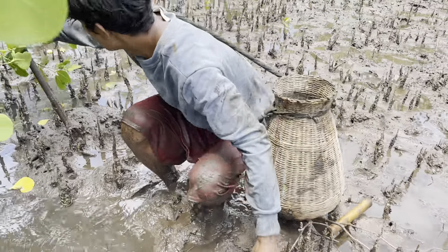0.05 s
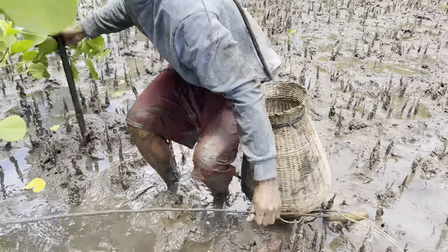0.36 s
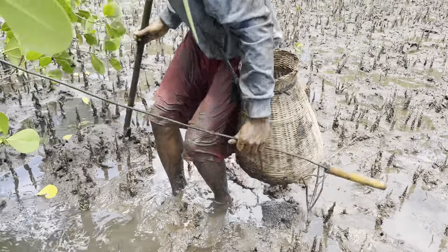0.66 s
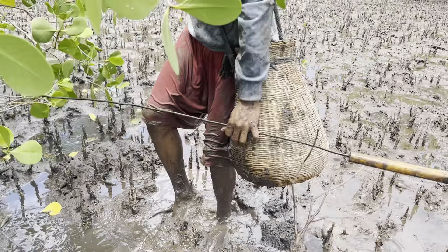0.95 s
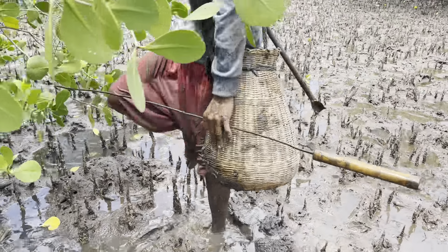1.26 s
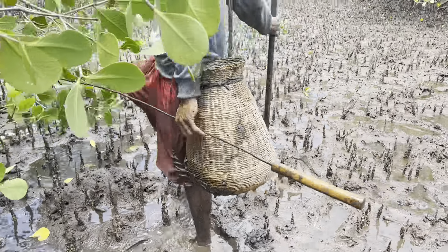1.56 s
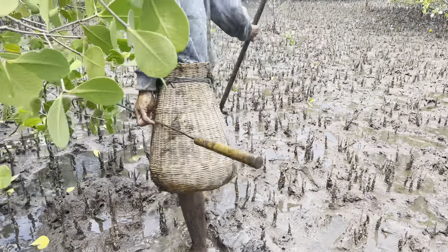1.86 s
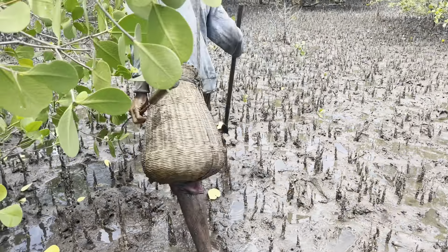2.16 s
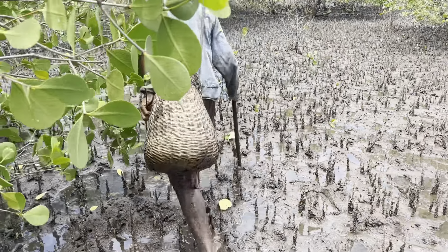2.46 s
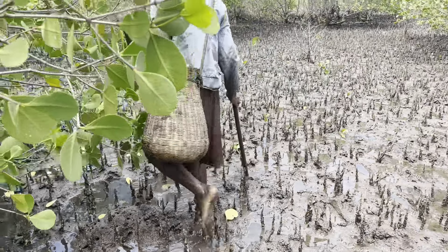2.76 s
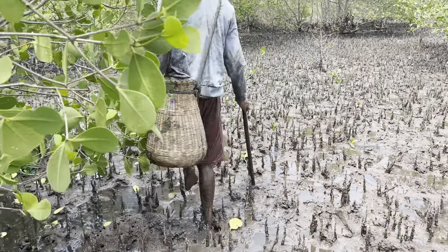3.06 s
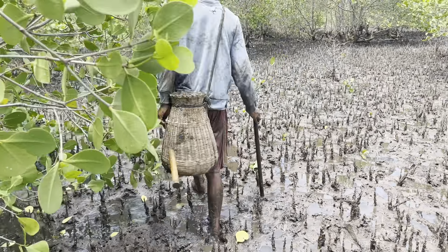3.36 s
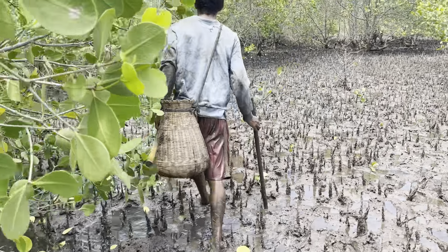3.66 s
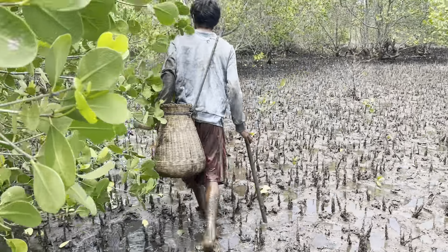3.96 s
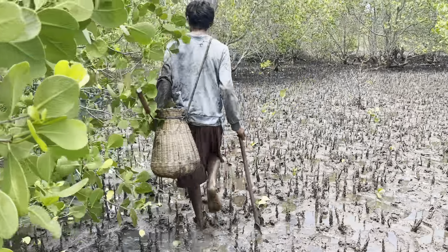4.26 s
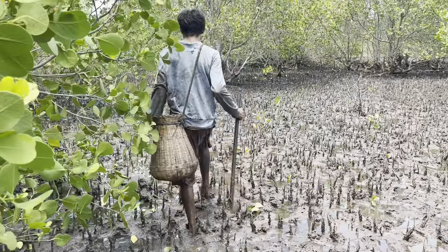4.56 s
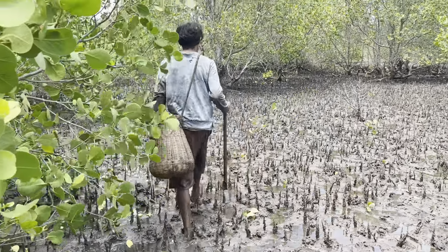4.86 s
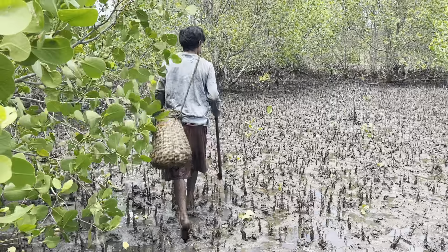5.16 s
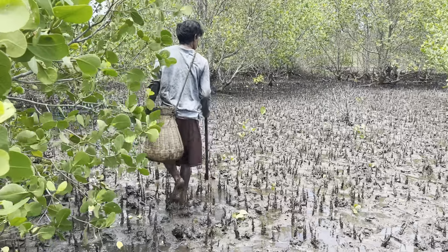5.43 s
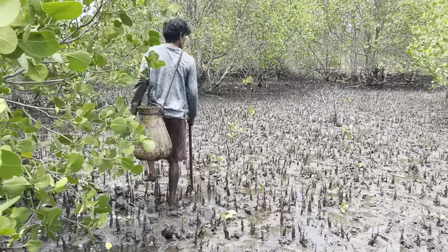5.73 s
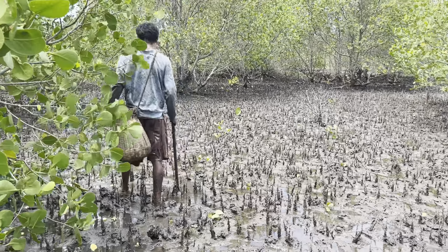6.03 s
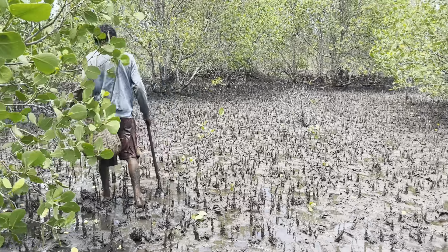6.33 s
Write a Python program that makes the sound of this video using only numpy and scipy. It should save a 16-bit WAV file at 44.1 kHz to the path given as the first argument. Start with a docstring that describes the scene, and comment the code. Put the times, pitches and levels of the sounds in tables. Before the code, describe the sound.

Someone wades off barefoot through sucking mud, with gurgles, wet pops, two light knocks on wicker and a far engine throb.

```python
"""Barefoot on a tidal mud flat.

A walker rises out of shallow water and wades off. Each foot sucks free in ringing air pockets, gurgles
and snapping mud films, squeezes out water and lands with a thud; the stirred slurry crackles on.
A carried tool knocks twice on a wicker basket. A slow boat engine thuds far away under faint open air."""
import sys
import numpy as np
from scipy import signal
from scipy.fft import rfft, irfft, next_fast_len
from scipy.io import wavfile
from scipy.ndimage import uniform_filter1d, map_coordinates

SR = 44100
rng = np.random.default_rng(int(sys.argv[2]) if len(sys.argv) > 2 else 0)


def master(y):
    """Save y as 16-bit WAV."""
    cut = np.clip(np.atleast_2d(y).T, -1, 1)
    pcm = np.round(cut * 32767)  # scale
    wavfile.write(sys.argv[1], SR, pcm.astype(np.int16))


N = 286203

# Event levels are relative: each source adds its own gain.
# Stirred mud. Each row: time in seconds, slurry level in dB, crackle level in dB.
STIR_LEVELS = [(0.0, -56, -52.5), (0.36, -53, -57.5), (1.14, -52.5, -53), (1.57, -67.5, -61.5),
               (1.81, -55.5, -58.5), (1.97, -62, -58), (2.17, -70, -71), (2.35, -74, -70), (2.42, -67, -61),
               (2.52, -60, -53), (2.6, -70, -55.5), (2.67, -50.5, -55.5), (2.86, -59.5, -61),
               (3.13, -61, -62.5), (3.42, -68.5, -67), (3.56, -60, -58.5), (4.05, -52.5, -56),
               (4.21, -53, -54), (4.37, -55, -56), (4.55, -58, -57), (4.75, -58, -59.5), (4.91, -58.5, -58),
               (5.03, -74, -69.5), (5.15, -69.5, -69), (5.33, -58, -60), (5.51, -64.5, -70),
               (5.8, -72.5, -74.5), (6.49, -77.5, -71.5)]
# Exhaust note. Each row: multiple of the firing rate, level in dB.
EXHAUST_ORDERS = [(5, -54), (6, -56), (7, -56.5), (9, -56.5), (10, -63), (11, -62.5), (17, -67.5)]
# Open air, growing as the microphone turns to the trees. Each row: time in seconds, level in dB.
AIR_LEVELS = [(2.3, -90.5), (5.8, -71.5)]
# Large air pockets. Each row: start in seconds, peak in dB, start in Hz, glide in octaves, t60 in seconds.
AIR_POCKETS = [(0.361, -36, 590, 0.5, 0.014), (0.502, -30.5, 1750, -1, 0.021),
               (0.574, -27, 910, -2.5, 0.019), (0.579, -24, 785, -1, 0.02), (0.582, -22.5, 1184, 0, 0.022),
               (0.584, -35, 1920, -0.9, 0.034), (0.6291, -22.5, 823, 0.7, 0.016),
               (0.855, -33.5, 430, -2.1, 0.021), (0.996, -20, 1636, 0.7, 0.0086),
               (0.996, -24.5, 886, 0.5, 0.016), (1.048, -41, 930, -3, 0.03), (1.073, -38, 640, 0, 0.049),
               (1.172, -35.5, 1070, 3, 0.013), (1.192, -33.5, 1670, 1, 0.01),
               (1.194, -41, 1040, -.4, 0.0096), (1.2811, -26, 865, 2.06, 0.037),
               (1.294, -34.5, 1306, 1, 0.037), (1.3205, -46.5, 2960, -0.5, 0.013),
               (1.407, -49, 924, 0.5, 0.1), (1.552, -44, 1980, 0.4, .018), (1.566, -46.5, 1740, -0.2, 0.04),
               (1.674, -31.5, 800, 2.5, 0.011), (1.753, -39, 2730, 1, .03), (1.755, -32, 1126, 1, 0.021),
               (1.764, -30.5, 1500, 3, 0.0046), (1.796, -40, 990, 0.5, 0.021),
               (2.151, -49, 1440, -1, 0.017), (2.4262, -29, 1444, 3.5, 0.012),
               (2.45, -33.5, 3370, -0.5, 0.034), (2.432, -26, 1520, 0.2, 0.017),
               (2.445, -36, 810, 0.2, 0.024), (2.46, -28.5, 1070, 0, 0.03), (2.477, -28, 1150, 0.5, 0.01),
               (2.484, -38, 1150, 1, .016), (2.492, -30, 905, 0.3, 0.022), (2.511, -34, 1000, 1.5, 0.017),
               (2.522, -33.5, 1660, 0.3, 0.017), (2.585, -30.5, 1055, 0, 0.021),
               (2.614, -28, 880, -0.5, 0.018), (2.65, -39, 1830, 2.5, 0.013),
               (2.733, -39.5, 536, 1.5, 0.049), (2.735, -43, 2000, 1, 0.015), (2.756, -40, 840, 0, 0.019),
               (2.778, -36.5, 1007, 3.5, 0.012), (3.414, -36.5, 740, 2.5, 0.01),
               (3.423, -40.5, 715, -1, 0.022), (3.443, -41.5, 640, -0.7, 0.028),
               (3.548, -44, 548, 0.5, 0.059), (3.743, -34.5, 954, -1.1, 0.021), (3.833, -38, 395, 0, 0.096),
               (3.877, -33.5, 1990, 3, 0.0091), (3.877, -32.5, 695, -0.2, 0.026),
               (3.916, -31.5, 2230, 1, 0.014), (3.926, -41, 2250, -2.5, .009),
               (3.943, -40.5, 930, 2.5, 0.012), (3.9669, -29.5, 1750, 0.3, 0.0044),
               (3.987, -47.5, 2200, 0, 0.01), (4.004, -30, 865, -1.3, 0.0049),
               (4.052, -29, 678, 1.15, 0.025), (4.056, -35, 2260, 0.7, 0.021), (4.1, -22, 1854, 0, 0.016),
               (4.098, -20, 2550, -0.5, 0.0062), (4.112, -33, 2630, 1, 0.0083),
               (4.127, -41, 1770, 4.5, 0.024), (4.14, -44.5, 1260, 3.5, 0.043),
               (4.157, -40.5, 750, -0.5, 0.052), (4.162, -40, 2920, -1, 0.012),
               (4.183, -25, 1150, 0, 0.0027), (4.189, -41, 1720, -0.2, 0.019), (4.253, -25, 917, 1, 0.0038),
               (4.2897, -31, 1720, -1.5, 0.0043), (4.345, -41, 1060, 4.5, .01),
               (4.354, -40, 1320, 1, 0.023), (4.377, -30, 2100, -0.5, 0.0025),
               (4.806, -40, 1670, 0, 0.0084), (5.118, -49, 2260, -1.1, 0.026),
               (5.235, -36, 2640, -0.1, 0.0061), (5.263, -35.5, 1940, 0.5, 0.0044),
               (5.537, -34, 420, -2.5, 0.016), (5.636, -50.5, 1690, 0.5, 0.031),
               (6.313, -51, 1520, 0, 0.012)]
# Water squirting out. Each row: start in seconds, spray in dB, slop in dB, length in seconds.
SQUIRTS = [(0.404, -46, -39.5, 0.041), (0.565, -50, -41, 0.016), (1.082, -40.5, -53, 0.039),
           (1.136, -39, -39, 0.028), (1.667, -42.5, -37, 0.025), (1.7, -41, -38, 0.021),
           (1.723, -51.5, -38.5, 0.07), (1.856, -48.5, -58, 0.051), (2.417, -60, -36, 0.03),
           (2.585, -53, -43.5, 0.02), (3.407, -48, -41, 0.049), (3.817, -40.5, -29, 0.028),
           (4.075, -50.5, -45, 0.026), (4.228, -52.5, -34, 0.034), (4.307, -43.5, -46, 0.034),
           (4.776, -49.5, -47, 0.068), (5.222, -64, -39, 0.024), (5.386, -56, -57, 0.064),
           (6.022, -51.5, -57, 0.045)]
# Mud films snapping, drops landing, and the tool's sharp tick on the basket (3.046 s).
# Each row: start in seconds, spray in dB, smack in dB, ping pitch in Hz, t60 in seconds.
SNAPS_AND_TICKS = [(0.5002, -21, -34, 4480, 0.02), (0.531, -25.5, -58, 3330, 0.0074),
                   (0.573, -32, -45, 8450, 0.043), (0.581, -22.5, -39, 2930, 0.019),
                   (0.627, -31.5, -22, 4290, 0.036), (0.706, -29.5, -39, 10600, 0.015),
                   (0.7768, -46, -21.5, 4800, 0.0099), (0.8246, -21, -48, 10500, 0.0058),
                   (0.8754, -36.5, -28.5, 3470, 0.04), (0.934, -31.5, -58.5, 4340, 0.074),
                   (0.971, -35, -53, 9100, 0.03), (1.0893, -23.5, -61, 8950, 0.033),
                   (1.2174, -28, -52, 8550, 0.011), (1.28, -30, -24, 5500, 0.014),
                   (1.467, -33.5, -34, 9300, 0.044), (1.672, -39, -20.5, 4630, 0.014),
                   (1.7031, -19.5, -25.5, 4690, 0.014), (1.8107, -30, -55, 7400, 0.0054),
                   (1.955, -36, -54, 8600, 0.016), (1.969, -33.5, -54, 8580, 0.012),
                   (2.153, -51, -58, 10700, 0.12), (2.473, -27, -43, 3270, 0.016),
                   (2.585, -29, -35, 8400, 0.015), (2.611, -32.5, -37, 8800, 0.064),
                   (2.783, -36, -39, 2810, 0.007), (3.046, -29, -68, 3570, 0.024),
                   (3.444, -35, -55, 8000, 0.014), (3.519, -35, -59, 9200, 0.015),
                   (3.546, -39.5, -35, 4370, 0.033), (3.7596, -26, -29, 7840, 0.026),
                   (3.815, -26, -12, 5200, 0.032), (3.8412, -26.5, -51, 8100, 0.019),
                   (3.9165, -22, -13.5, 5150, 0.0054), (4.0037, -30.5, -41, 8430, 0.012),
                   (4.023, -33, -48, 6600, 0.011), (4.0538, -30, -45, 5400, .01),
                   (4.1022, -14.5, -45, 10700, 0.013), (4.162, -37, -42, 5500, .006),
                   (4.184, -30.5, -37, 9300, 0.02), (4.226, -33, -41.5, 5450, 0.071),
                   (4.253, -41, -36, 5630, .004), (4.276, -35, -25.5, 11300, 0.021),
                   (4.2904, -26, -14.5, 4170, 0.012), (4.3765, -32, -38, 3380, 0.0036),
                   (4.524, -42.5, -43, 4630, 0.079), (4.804, -34, -52, 5600, 0.034),
                   (4.955, -44, -40, 4680, 0.063), (5.1218, -43, -46.5, 8340, 0.14),
                   (5.2817, -34.5, -30, 8000, 0.0084), (5.3595, -32, -35, 8200, 0.036),
                   (5.43, -27.5, -35, 4500, 0.0064), (5.44, -40, -30, 2640, 0.009),
                   (5.5339, -37, -20.5, 3720, 0.0082), (5.7751, -42.5, -35, 8350, 0.016)]
# Air drawn under a lifting foot.
# Each row: start and end in seconds, level in dB, first and last cavity pitch in Hz.
GURGLE_RUNS = [(0.574, 0.59, -35.5, 930, 954), (0.999, 1.076, -49, 1090, 740),
               (1.743, 1.786, -48.5, 1490, 1200), (1.856, 1.903, -49.5, 665, 1690),
               (2.424, 2.437, -44.5, 1740, 1540), (2.441, 2.491, -42.5, 952, 1150),
               (2.452, 2.477, -55, 3260, 3050), (2.509, 2.537, -44.5, 1010, 934),
               (2.539, 2.583, -50, 720, 960), (2.587, 2.599, -45.5, 2320, 2190),
               (2.599, 2.666, -50, 950, 1100), (2.713, 2.798, -53, 810, 1240),
               (3.244, 3.389, -64.5, 517, 454), (3.558, 3.613, -64, 474, 726),
               (3.63, 3.708, -61, 1600, 2010), (3.9, 4.09, -57, 1690, 1300), (4.114, 4.2, -57, 1420, 2060),
               (4.234, 4.259, -61, 1000, 860), (5.227, 5.268, -57.5, 1510, 2250),
               (6.09, 6.14, -68.5, 1200, 1520)]
# Weight landing. Each row: start in seconds, level in dB, t60 in seconds.
FOOTFALLS = [(0.593, -32.5, 0.045), (3.825, -38, 0.16), (4.008, -33.5, 0.033), (4.243, -39, 0.091),
             (4.293, -45, 0.04), (5.54, -46, 0.073)]
# Hollow under a foot. Each row: pitch in Hz, level in dB, share of the footfall's t60.
HOLLOW_MODES = [(142.4, 5.5, 2), (189, -17, 0.31), (305, 3, 0.21), (404.4, -3, 0.46), (466, -18, 0.54)]
# Tool on basket. Each row: start in seconds, level in dB, crunch in dB, low and high mode cutoff in Hz.
TOOL_KNOCKS = [(2.827, -32.5, -1.5, 119, 8840), (3.044, -40.5, -15.5, 646, 4200)]
# Tool and basket ringing. Each row: pitch in Hz, level in dB, t60 in seconds.
BASKET_MODES = [(185, -6, .24), (395, -12, .12), (790, -11, .08), (1050, -7, .08), (2975, -4, .07),
                (3140, -4, .07), (3650, -5, .06), (3980, -5, .08), (4060, -6, .085), (4555, 0, .07),
                (4650, -1, .07), (5110, -3, .06), (5820, -9, .05), (8400, -7, .06)]

# Spectra. Each row: frequency in Hz, gain in dB.
SLOP_DB = [(150, 2.5), (350, -3.5), (700, -3.5), (1300, -4), (1900, -1), (2600, -8), (3400, -13.5),
           (5000, -49), (9000, -61)]
MUD_FIZZ_DB = [(1500, -12), (2800, 1), (4000, 4.5), (5000, 2.5), (6500, -2), (8500, 5.5), (11300, -4.5),
               (13000, -20), (16000, -29)]
EXHAUST_DB = [(20, -57), (30, -28), (40, -11), (65, 2), (86, -7), (115, -6.5), (145, -18), (183, -17),
              (205, -20.5), (500, -51), (650, -102)]
AIR_DB = [(100, 14), (300, -19), (800, 8), (2000, -13), (4000, 7.5), (6500, -15), (9000, 4), (12000, -37)]
SPRAY_DB = [(1200, -50), (2500, 3), (4500, 6), (5600, 2), (6800, 0), (8500, 8.5), (11300, -6),
            (13000, -8.5), (16000, -60)]
TICK_DB = [(300, -25), (1200, 3), (3000, -14), (7000, -12), (12000, -17), (16000, -8)]
GROUND_DB = [(50, -6), (130, -3), (180, 3.5), (290, -14.5), (400, -8), (550, -12.5), (900, -19.5),
             (2500, -43)]
CANES_DB = [(120, -7), (260, -0.5), (450, -3.5), (800, -7), (1900, -8.5), (3400, -8), (5000, -37)]
MICROPHONE_DB = [(20, -8), (50, -4), (6000, 0), (7000, -3), (9400, -1), (10600, 9), (11800, 2.5),
                 (12700, -8.5), (13600, -22), (15500, -11)]

# Phase between the microphone ports for near feet, far feet, the basket and the ports' own treble.
# Each row: frequency in Hz, left lead in radians.
NEAR_LEAD_RAD = [(100, 0.1), (1000, 0.12), (1800, 0.44), (2400, 1.44), (4500, 1.75), (6500, 0.042)]
FAR_LEAD_RAD = [(100, 0.17), (1900, 0.41), (2400, 1.5), (3400, 1.04), (4300, 4.4), (5700, 6), (7000, 6.28)]
BASKET_LEAD_RAD = [(100, 0.22), (1400, 1.03), (2800, 2.26), (3700, .1), (5200, 1.5), (5700, 7.2),
                   (7000, 5.6)]
PORT_LEAD_RAD = [(5900, 0), (6800, -.5), (7600, 1.1), (8400, .4), (9200, -.95), (10250, -3.14),
                 (11000, -4.8), (11800, -6.25), (13000, -7)]
# Port imbalance. Each row: frequency in Hz, left over right in dB.
PORT_SHADE_DB = [(5900, -0.5), (7200, 6.5), (7900, 0)]
# Diffuse sound. Each row: frequency in Hz, correlation between the ports.
PORT_COHERENCE = [(60, 0.88), (300, 0.55), (1300, 0.56), (3000, 0.048), (6500, 0.35), (8500, 0.85),
                  (11500, 1)]

FIRING_HZ = 10.6
PING_DB, PING_CYCLES = 1, 30  # ring lengths in cycles are to -60 dB
GULPS_PER_S, MUD_CUTOFF_HZ = 380, 3240
SHED_PER_S, SHED_DB, SHED_CYCLES, SHED_GLIDE_RATIO = 110, -2, 13, 1.7
CANE_DRIFT_TURNS = .0075  # random phase step per sample at 4 kHz
TURN_S = 2.8  # the microphone turns to follow the walker


def amp(db):
    """Decibels to gain."""
    return 10 ** (np.asarray(db) / 20)


def unit(x):
    """Scale to rms 1."""
    return x / np.sqrt(np.mean(x ** 2) + 1e-20)


def along(points, hz):
    """Read (Hz, value) points on a log axis."""
    knots_hz, values = np.transpose(points)
    return np.interp(np.log(hz + 1), np.log(np.sort(knots_hz) + 1), values)


def curves(rows):
    """One value per sample for each column after the time."""
    times_s, *columns = np.transpose(rows)
    return [np.interp(np.arange(N) / SR, times_s, column) for column in columns]


def wobble(knots_per_s):
    """Smooth random curve."""
    return map_coordinates(rng.standard_normal(4096), [np.arange(N) * knots_per_s / SR], mode="wrap")


def filtered(x, response):
    """Apply a complex frequency response."""
    size = next_fast_len(N + SR // 2)
    return irfft(rfft(x, size) * response(np.fft.rfftfreq(size, 1 / SR)), size)[..., :N]


def coloured(x, spectrum_db):
    """Minimum-phase filter with the given spectrum."""
    size = 4096
    cepstrum = irfft(np.log(amp(along(spectrum_db, np.fft.rfftfreq(size, 1 / SR)))))
    cepstrum[1:size // 2] *= 2
    cepstrum[size // 2 + 1:] = 0
    impulse = irfft(np.exp(rfft(cepstrum)))
    return signal.fftconvolve(np.atleast_2d(x), impulse[None], axes=1)[:, :N]


def add(track, start_s, sound):
    """Mix a sound into the track."""
    part = track[max(round(start_s * SR), 0):][:len(sound)]
    part += sound[:len(part)]


def wide(pair, response):
    """Filter two unrelated signals and blend them to the ports' coherence."""
    def mid_side(hz):
        angle_rad = np.arccos(np.clip(along(PORT_COHERENCE, hz), -1, 1)) / 2
        return response(hz) * [np.cos(angle_rad), np.sin(angle_rad)]
    mid, side = filtered(pair, mid_side)
    return np.array([mid + side, mid - side])


def diffuse(pair, spectrum_db):
    """Wide sound of rms 1 with the given spectrum."""
    return unit(wide(pair, lambda hz: amp(along(spectrum_db, hz))))


def direct(x, lead_rad):
    """Sound from one direction: the right port lags."""
    return filtered(x, lambda hz: np.exp(-1j * along(lead_rad, hz) * [[0], [1]]))


def froth(count, centre_hz, scatter, cycles, spread_db):
    """Small bubbles, each ringing a few cycles as its pitch slides."""
    t = np.arange(SR // 50) / SR
    start, size = rng.random((2, count, 1))
    pitch, slide, life, polarity = rng.standard_normal((4, count, 1))
    hz = np.clip(centre_hz * np.exp(scatter * pitch), 500, 11000)
    age = t * hz / (cycles * np.exp(0.58 * life))
    turns = np.cumsum(hz * 2 ** (0.7 * (slide + .5) * np.minimum(age, 1)), axis=1) / SR
    size_db = spread_db * np.minimum(-np.log(size + 1e-9), 3)
    rings = np.sign(polarity) * amp(size_db - 60 * age) * np.sin(2 * np.pi * turns)
    samples = (start * N).astype(int) + np.arange(len(t))
    return unit(np.bincount(samples.ravel(), rings.ravel(), N)[:N])


def crackle(pops_per_s, spread_db, hiss_db):
    """Tiny pops of uneven size over smooth hiss."""
    chance, size = rng.random((2, N))
    gains = amp(spread_db * np.minimum(-np.log(size + 1e-9), 4))
    pops = (chance < pops_per_s / SR) * gains * rng.choice([-1, 1], N)
    return unit(unit(pops) + amp(hiss_db) * rng.standard_normal(N))


def slurry(bubble_db, tick_db, wash_db, fizz_db, uneven_db):
    """Stirred mud ticks over a fine fizz; being thick, it damps its bubbles fast."""
    slurry_db, crackle_db = curves(STIR_LEVELS)
    clumps_db = uneven_db * wobble(45)
    bubbles = froth(count=1300, centre_hz=1500, scatter=.5, cycles=12, spread_db=4)
    ticks = froth(count=1500, centre_hz=5200, scatter=.42, cycles=22, spread_db=4)
    wash = diffuse(rng.standard_normal((2, N)), SLOP_DB)
    films = np.array([crackle(pops_per_s=2500, spread_db=3.5, hiss_db=2) for side in range(2)])
    low = amp(bubble_db) * bubbles + amp(wash_db) * wash
    high = amp(fizz_db) * diffuse(films, MUD_FIZZ_DB) + amp(tick_db) * ticks
    return amp(slurry_db + clumps_db) * low + amp(crackle_db + clumps_db / 2 + wobble(30)) * high


def boat(note_db, rumble_db, waver_db, flutter_db):
    """Only a slow engine's low orders and rumble carry across the flat, wavering with the air."""
    turns = FIRING_HZ * np.arange(N) / SR + 0.028 * wobble(1.4)
    note = np.zeros(N)
    for order, db in EXHAUST_ORDERS:
        peak = amp(db + waver_db * wobble(2.478)) * np.sqrt(2)
        note += peak * np.sin(2 * np.pi * (order * turns + .5 * rng.random()))
    throb = amp(flutter_db * wobble(17))
    rumble = throb * diffuse(rng.standard_normal((2, N)), EXHAUST_DB)
    return amp(note_db) * note + amp(rumble_db) * rumble


def open_air():
    """Faint wide hiss, slowly growing."""
    return amp(curves(AIR_LEVELS)[0]) * diffuse(rng.standard_normal((2, N)), AIR_DB)


def pockets(level_db, swell_t60s, seal_t60s, pitch_jitter, quiver_db, grit_db):
    """Air pockets ring until mud seals them; pitch rises as a mouth opens, falls as a cavity grows."""
    out, t = np.zeros(N), np.arange(SR // 12) / SR
    noises = rng.standard_normal((256, 2, len(t)))
    rows = AIR_POCKETS + shed_pockets(scatter=.3, spread_db=3, glide_octaves=0.5)
    for (start_s, db, start_hz, octaves, t60_s), noise in zip(rows, noises):
        swell = 1 - np.exp(-t / (swell_t60s * t60_s))
        envelope = swell * amp(-60 * t / t60_s) / (1 + (t / (seal_t60s * t60_s)) ** 6)
        flutter, tremble = unit(uniform_filter1d(noise, size=60))  # soft walls quiver
        hz = start_hz * 2 ** (octaves * np.minimum(t / t60_s, 1)) * (1 + pitch_jitter * flutter)
        ring = np.sin(2 * np.pi * np.cumsum(hz) / SR) * (1 + amp(grit_db) * noise[0])
        add(out, start_s, amp(db + level_db + quiver_db * tremble) * envelope / envelope.max() * ring)
    return out


def splashes(spray_db, slop_db):
    """Squeezed water swells quickly and dies away in droplets and bubbles."""
    spray, slop, t = np.zeros(N), np.zeros(N), np.arange(SR // 3) / SR
    for start_s, high_db, low_db, length_s in SQUIRTS:
        age = 3 * t / length_s
        envelope = age * np.exp(1 - age)
        add(spray, start_s, amp(high_db + spray_db) * envelope)
        add(slop, start_s, amp(low_db + slop_db) * envelope)
    drops = np.array([crackle(pops_per_s=5000, spread_db=6, hiss_db=-2) for side in range(2)])
    bubbles = froth(count=5000, centre_hz=1600, scatter=0.5, cycles=11, spread_db=3.5)
    return spray * diffuse(drops, MUD_FIZZ_DB) + slop * bubbles


def snaps(spray_db, smack_db, tick_db, rise_s):
    """A mud film tears, a drop lands or the tool clicks: sharp tick, bright spit, dull smack, ping."""
    ticks, spray, smack, pings = np.zeros((4, N))
    t = np.arange(SR // 6) / SR
    onset = 1 - np.exp(-t / rise_s)
    for start_s, high_db, low_db, hz, t60_s in SNAPS_AND_TICKS:
        envelope = onset * amp(-60 * t / t60_s)
        add(ticks, start_s + rise_s, [amp(high_db + tick_db)])
        add(spray, start_s, amp(high_db + spray_db) * envelope)
        add(smack, start_s, amp(low_db + smack_db) * envelope)
        age = t * hz / PING_CYCLES  # in mud, the ping is a tiny bubble
        turns = np.cumsum(hz * (1 + 0.2 * np.minimum(age, 1))) / SR
        add(pings, start_s, amp(high_db + PING_DB - 60 * age) * onset * np.sin(2 * np.pi * turns))
    spit = unit(coloured(crackle(pops_per_s=4500, spread_db=9.5, hiss_db=1.5), SPRAY_DB))
    slap = unit(coloured(rng.standard_normal(N), SLOP_DB))
    return coloured(ticks, TICK_DB) + spray * spit + smack * slap + pings


def gurgles(scatter, cycles, upper_ratio, upper_db, uneven_db, grit_db):
    """Air slurps through mud in dense gulps, each ringing two modes of the changing cavity."""
    out, t = np.zeros(N), np.arange(SR // 40) / SR
    for start_s, end_s, db, from_hz, to_hz in GURGLE_RUNS:
        length_s = max(end_s - start_s, .01)
        count = max(int(length_s * GULPS_PER_S), 2)
        run = np.zeros(int(length_s * SR) + len(t))
        for k, (late, pitch, size, shape) in enumerate(rng.standard_normal((128, 4))[:count]):
            progress = np.clip((k + .5 + .5 * late) / count, 0, 1)
            hz = from_hz * (to_hz / from_hz) ** progress
            turns = t * hz * np.exp(scatter * pitch)
            upper_hz = hz * upper_ratio * np.exp(scatter * shape)
            upper_gain = amp(upper_db) / (1 + (upper_hz / MUD_CUTOFF_HZ) ** 4)  # soft walls absorb
            modes = np.sin(2 * np.pi * turns) + upper_gain * np.sin(2 * np.pi * upper_hz * t)
            envelope = amp(uneven_db * size - 60 * turns / cycles) * (1 - np.exp(-2 * turns))
            add(run, progress * length_s, envelope * modes)
        grit = amp(grit_db) * rng.standard_normal(len(run))  # wet silt tears
        add(out, start_s, amp(db) * unit(run) * (1 + grit))
    return out


def shed_pockets(scatter, spread_db, glide_octaves):
    """Gurgles shed small pockets near the cavity's pitch, gliding with it. Rows as in AIR_POCKETS."""
    rows = []
    for start_s, end_s, db, from_hz, to_hz in GURGLE_RUNS:
        count = max(round((end_s - start_s) * SHED_PER_S), 1)
        for k, (late, size, pitch, slide) in enumerate(rng.uniform(-1, 1, (32, 4))[:count]):
            progress = (k + .5 + .5 * late) / count
            at_s = start_s + progress * (end_s - start_s)
            hz = from_hz * (to_hz / from_hz) ** progress * np.exp(scatter * pitch)
            octaves = SHED_GLIDE_RATIO * np.log2(to_hz / from_hz) + glide_octaves * slide
            rows.append((at_s, db + SHED_DB + spread_db * size, hz, octaves, SHED_CYCLES / hz))
    return rows


def thuds(ring_db, push_db):
    """Soft ground takes the weight with a dull push; the hollow underfoot booms briefly."""
    weight, boom, t = np.zeros(N), np.zeros(N), np.arange(SR // 3) / SR
    onset = 1 - np.exp(-t / 0.0058)
    for start_s, db, t60_s in FOOTFALLS:
        add(weight, start_s, amp(db + push_db - 60 * t / t60_s) * onset)
        for hz, mode_db, share in HOLLOW_MODES:
            envelope = amp(db + ring_db + mode_db - 60 * t / (t60_s * share)) * onset
            add(boom, start_s, envelope * np.sin(2 * np.pi * (hz * t + rng.random())))
    return boom + weight * unit(coloured(rng.standard_normal(N), GROUND_DB))


def basket(body_db, crack_db, ring_db, rattle_s):
    """The tool strikes and chatters on wicker, ringing both; a light blow excites a narrower band."""
    out, t = np.zeros(N), np.arange(SR // 3) / SR
    age = t / rattle_s
    chatter = amp(-60 * t / 0.014) + age * np.exp(1 - age)  # first touch, then the canes give way
    for start_s, db, crunch_db, low_hz, top_hz in TOOL_KNOCKS:
        ring = np.zeros(len(t))
        for hz, mode_db, t60_s in BASKET_MODES:
            # loose canes blur each mode
            drift = np.cumsum(rng.standard_normal(len(t))) * CANE_DRIFT_TURNS * np.sqrt(hz / 4000)
            envelope = amp(mode_db - 60 * t / t60_s) / (1 + (low_hz / hz) ** 2 + (hz / top_hz) ** 8)
            ring += envelope * np.sin(2 * np.pi * (hz * t + drift + rng.random()))
        pops = crackle(pops_per_s=2500, spread_db=3, hiss_db=9)
        cracks = unit(coloured(pops, SPRAY_DB))[0, :len(t)]
        canes = unit(coloured(rng.standard_normal(N), CANES_DB))[0, :len(t)]
        crunch = amp(crunch_db) * chatter * (amp(crack_db) * cracks + amp(body_db) * canes)
        onset = 1 - np.exp(-t / (0.0083 * amp(crunch_db)))
        add(out, start_s, amp(db) * (amp(ring_db) * ring * onset + crunch))
    return out


def scattering(x, t60_s, highpass_hz):
    """Roots and leaves scatter a short tail, different at each port; long waves pass them by."""
    t = np.arange(SR // 4) / SR
    tail = rng.standard_normal((2, len(t))) * amp(-60 * t / t60_s)
    scattered = signal.fftconvolve(x, tail / np.linalg.norm(tail[0]), axes=1)[:, :N]
    return wide(scattered, lambda hz: 1j * hz / (1j * hz + highpass_hz))


def scene():
    """Feet, basket and their scattered sound over open air and the boat."""
    feet = pockets(level_db=1.25, swell_t60s=0.092, seal_t60s=0.76,
                   pitch_jitter=0.07, quiver_db=0.5, grit_db=-18.5) * amp([[-.5], [.5]])
    feet += gurgles(scatter=0.199, cycles=21, upper_ratio=1.8, upper_db=-3.5,
                    uneven_db=3.5, grit_db=-12.5)
    feet += snaps(spray_db=-4, smack_db=-10, tick_db=-1, rise_s=0.00061)
    feet += splashes(spray_db=2, slop_db=-10)
    feet += thuds(ring_db=-6, push_db=5.5)
    wicker = basket(body_db=0, crack_db=-1, ring_db=6, rattle_s=0.014) * amp([[1], [-1]])
    mud = feet + slurry(bubble_db=-6.5, tick_db=-4, wash_db=-2, fizz_db=1, uneven_db=3)
    far = np.clip((np.arange(N) / SR - TURN_S) * 20, 0, 1)  # 50 ms crossfade
    walker = direct(mud * (1 - far), NEAR_LEAD_RAD) + direct(mud * far, FAR_LEAD_RAD)
    walker += direct(wicker, BASKET_LEAD_RAD)
    air = open_air()
    tail = amp(-6.5) * scattering(feet + wicker, t60_s=0.071, highpass_hz=620)
    engine = boat(note_db=-4.5, rumble_db=-48.5, waver_db=3, flutter_db=1.6)
    return walker + tail + air + engine


def record(dry):
    """Microphone colour, treble shade and phase per port, 16 kHz band limit."""
    def ports(hz):
        shade = amp(along(PORT_SHADE_DB, hz) * [[.5], [-.5]])
        shift = np.exp(.5j * along(PORT_LEAD_RAD, hz) * [[1], [-1]])
        return shade * shift * (hz < 16000)
    return filtered(coloured(dry, MICROPHONE_DB), ports)


dry = scene()
out = record(dry)
master(out)
```